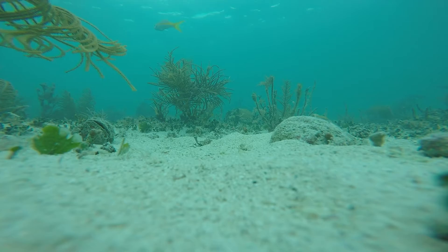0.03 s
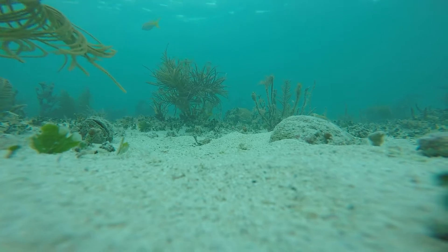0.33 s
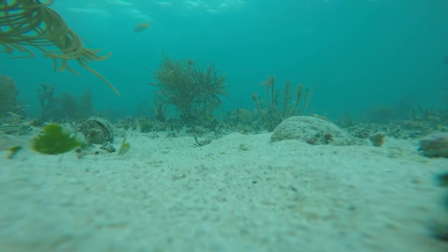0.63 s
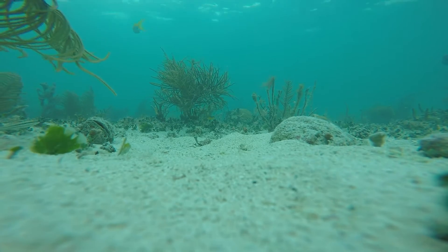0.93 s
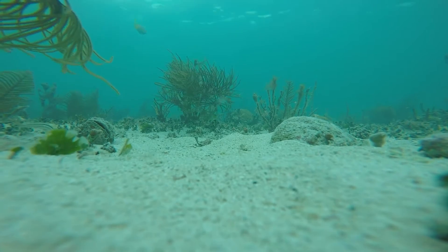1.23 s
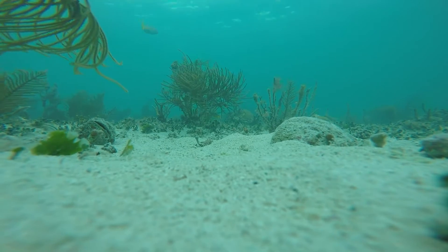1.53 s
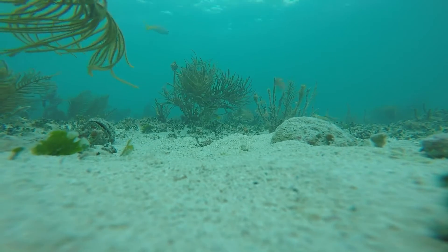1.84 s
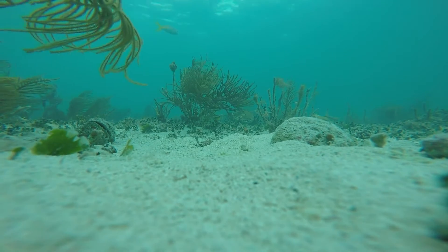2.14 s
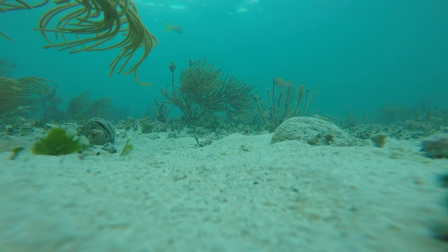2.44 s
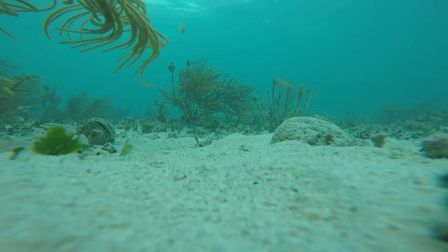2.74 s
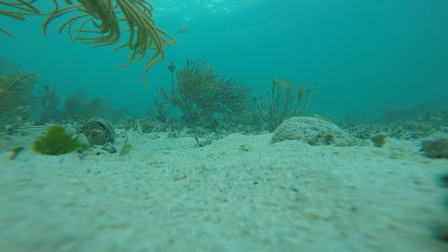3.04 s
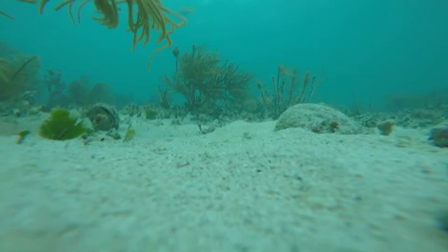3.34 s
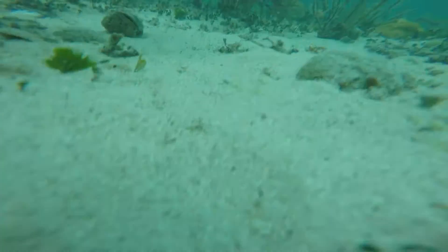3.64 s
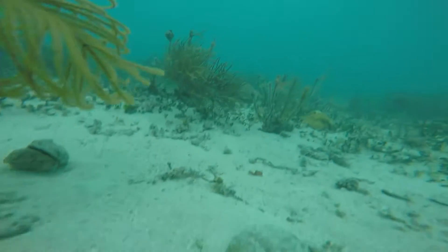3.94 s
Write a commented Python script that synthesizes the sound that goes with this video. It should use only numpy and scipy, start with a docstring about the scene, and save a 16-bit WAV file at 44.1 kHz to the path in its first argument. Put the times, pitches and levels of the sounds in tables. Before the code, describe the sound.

Hollow, grainy scraping comes through the housing of an underwater camera on a reef, amid snapping shrimp and a low hum. After a lull, water and sand rush past, ending in a loud, sharp knock and a brief low throb.

```python
"""A waterproof camera housing scrapes and rocks on a sandy reef, is pulled up with a gritty rush,
takes one hard knock and shudders. Tiny slips and the blow ring the case; moving water buffets it.
Around it shrimp snap, each a dull crack and then a bright one, over water noise, a low hum and
the camera's thin whine. All is heard through the case, in mono; the knock overloads the microphone."""
import sys
import numpy as np
from scipy import signal
from scipy.fft import rfft, irfft
from scipy.io import wavfile
from scipy.ndimage import uniform_filter1d, map_coordinates

SR = 44100
rng = np.random.default_rng(int(sys.argv[2]) if len(sys.argv) > 2 else 0)


def materialize(psi):
    """Save the field psi as 16-bit PCM at rate SR to the path in sys.argv[1].

    A 1-D psi becomes a single channel; in a 2-D psi each row is a channel.
    """
    bounded = np.clip(np.atleast_2d(psi).T, -1, 1)
    quanta = np.round(bounded * 32767).astype(np.int16)
    wavfile.write(sys.argv[1], SR, quanta)


N = 176400


def undb(db):
    """Decibels to gain."""
    return 10 ** (np.asarray(db) / 20)


def unit(x):
    """Scale to an rms of 1."""
    return x / np.sqrt(np.mean(x ** 2))


def clock():
    """Time of each sample in seconds."""
    return np.arange(N) / SR


def curve(rows, column=1):
    """One column of a table, joined by straight lines in time."""
    rows = np.array(rows)
    return np.interp(clock(), rows[:, 0], rows[:, column])


def swell(rows, column=1):
    """Gain envelope from a dB curve, silent outside its span."""
    return undb(curve(rows, column)) * (clock() >= rows[0][0]) * (clock() <= rows[-1][0])


def colour(x, eq):
    """Minimum-phase filter of unit energy, shaped by (freq_hz, gain_db) points."""
    size = 16384
    hz, db = np.array(eq).T
    freqs = np.maximum(np.fft.rfftfreq(size, 1 / SR), 1)
    gain = undb(np.interp(np.log(freqs), np.log(hz), db))
    cepstrum = irfft(np.log(gain))
    cepstrum[1:size // 2] *= 2
    cepstrum[size // 2 + 1:] = 0
    impulse = irfft(np.exp(rfft(cepstrum)))
    return signal.fftconvolve(x, impulse / np.linalg.norm(impulse))[:N]


def butter(order, hz, kind="low"):
    """Butterworth filter sections."""
    return signal.butter(order, hz, kind, fs=SR, output="sos")


def wander(rate_hz):
    """Smooth random drift, rms 1."""
    knots = rng.standard_normal(2048)
    return unit(map_coordinates(knots, [clock() * rate_hz], order=3, mode="mirror"))


def fade(t, t60):
    """Exponential decay that starts at t = 0."""
    return (t >= 0) * np.exp(-np.log(1000) * np.maximum(t, 0) / t60)


def add(track, start_s, sound):
    """Mix a sound into a track in place."""
    i = int(np.clip(start_s * SR, 0, N - 1))
    track[i:i + len(sound)] += sound[:N - i]


def crack(hz, t60, width=.5):
    """A noise burst of unit energy in one broad resonance; width is a share of the pitch."""
    burst = rng.standard_normal(1024) * fade(clock()[:1024], t60)
    rung = signal.lfilter(*signal.iirpeak(min(hz, SR / 4), 1 / width, fs=SR), burst)
    return rung / np.linalg.norm(rung)


def scatter(x, t60):
    """Smear clicks with a decaying cloud of reflections of unit energy."""
    t = clock()[:SR // 4]
    cloud = rng.standard_normal(len(t)) * fade(t, t60)
    return signal.fftconvolve(x, cloud / np.linalg.norm(cloud))[:N]


def friction(eq, slips_per_s, spread_db, hiss_db, spurt_db):
    """Many small slips and a smooth hiss ring the case, in quick spurts under a steady pressure."""
    sizes = undb(spread_db * np.minimum(rng.exponential(size=N), 4))
    slips = unit((rng.random(N) < slips_per_s / SR) * sizes * rng.choice([-1, 1], N))
    hiss = undb(hiss_db) * rng.standard_normal(N)
    spurts = (slips + hiss) * undb(spurt_db * wander(140))
    steady = spurts / np.sqrt(uniform_filter1d(spurts ** 2, size=1800) + 1e-9)
    return unit(colour(steady, eq))


def glide(rows, rough):
    """A wavering tone that follows (time_s, pitch_hz, level_db) points."""
    phase = 2 * np.pi * np.cumsum(curve(rows)) / SR
    tone = (1 + rough * wander(110)) * np.sin(phase) + rough * wander(110) * np.cos(phase)
    return swell(rows, column=2) * tone


# Dark tone of the water bed: freq_hz, gain_db
WATER_EQ = [(10, -29), (25, 1), (55, -5.5), (85, -3), (130, -8.5), (260, -19), (440, -19.5), (600, -11),
            (1100, -31), (1650, -28), (2150, -26.5), (2400, -31.5), (2700, -26.5), (3400, -32),
            (9000, -40.5), (15500, -44.5)]


def water():
    """A steady bed of water noise whose level drifts slightly."""
    return undb(-52 + .6 * wander(5.2)) * colour(rng.standard_normal(N), WATER_EQ)


def hum(pitch_hz=87.5, rise_db_per_s=2.5):
    """A low, wavering underwater hum that slowly grows."""
    t = clock()
    phase = 2 * np.pi * pitch_hz * t + .76 * wander(7.3)
    level_db = -53.5 + rise_db_per_s * (t - t.mean()) + 1.8 * wander(7.92)
    return undb(level_db) * unit(np.sin(phase))


# Partials of the camera's whine: pitch_hz, level_db
WHINE_PARTIALS = [(6309, -78), (12618, -80.5)]


def whine():
    """The camera gives off two faint, steady tones an octave apart."""
    return sum(undb(db) * unit(np.sin(2 * np.pi * hz * clock())) for hz, db in WHINE_PARTIALS)


def far_snaps(per_s=80, centre_hz=2550, octaves=.42, spread_db=2.5):
    """Cues for many weak snaps at random times, each with its own pitch and strength."""
    chance = rng.random(size=(1024, 4))[:int(per_s * N / SR)]
    start_s = chance[:, 0] * N / SR
    pitch_hz = centre_hz * 2 ** (octaves * (2 * chance[:, 1] - 1))
    boost_db = spread_db * np.minimum(-np.log(chance[:, 2:]), 4)
    return list(zip(start_s, pitch_hz, -27 + boost_db[:, 0], -28.5 + boost_db[:, 1]))


# Close shrimp snaps, levels before each layer's trim: start_s, pitch_hz, dull_db, bright_db
NEAR_SNAPS = [(.276, 1480, -9.5, -33), (.344, 1480, -2, -23), (.511, 1990, -3, -8.5),
              (0.651, 2680, 6.5, -9), (.741, 3100, -12.5, -14.5), (.868, 2380, -7.5, -16),
              (.922, 2650, -10, -9), (1.142, 2470, -6, -10), (1.228, 2660, -11.5, -29),
              (1.418, 2900, -12, -12), (1.473, 2700, -7, -12), (1.5074, 2770, 2, -21),
              (1.611, 2000, -17, -11.5), (1.713, 2300, -2.5, -8), (1.751, 2920, -11.5, -18),
              (1.839, 3900, -21, -13), (2.173, 2210, -20, -9), (2.3208, 2400, 8, -0.5),
              (2.454, 2700, -17, -16), (2.5, 3270, -21, -16), (2.621, 3400, -30, -14),
              (2.696, 3000, -8, -10), (2.7236, 2580, -7.5, -20), (2.8357, 2400, 2.5, -6),
              (2.961, 2140, -8.5, -18), (3.3361, 1690, -6, -28), (3.7272, 1980, -9.5, -23),
              (3.806, 2704, -12.5, -25.5)]


def shrimp(dull_trim_db=-10.5, bright_trim_db=-16.5, bright_lag_s=.0031, bright_ratio=4870 / 2550):
    """Each snap is a dull crack and then a bright one, scattered by the seabed; far ones crackle."""
    dull, bright = np.zeros((2, N))
    for start_s, hz, dull_db, bright_db in list(NEAR_SNAPS) + far_snaps():
        add(dull, start_s, undb(dull_db + dull_trim_db) * crack(hz, t60=.02))
        spark = crack(hz * bright_ratio, t60=.007, width=.7)
        add(bright, start_s + bright_lag_s, undb(bright_db + bright_trim_db) * spark)
    snaps = signal.sosfilt(butter(4, 4200), dull) + signal.sosfilt(butter(1, 13600), bright)
    return snaps + undb(-10.5) * scatter(snaps, t60=.087)


# Sand ticks on the lifted case: start_s, level_db
SAND_TICKS = [(3.878, -22), (3.914, -31), (3.933, -32), (3.961, -32), (3.985, -31)]


def grit():
    """Single sand grains strike the case with thin, high ticks."""
    ticks = np.zeros(N)
    for start_s, db in SAND_TICKS:
        add(ticks, start_s, undb(db) * crack(hz=8200, t60=.014))
    return ticks


# Hollow blips, gurgles and thuds against the case: start_s, pitch_hz, level_db, t60_s
BLIP_CUES = [(.168, 804, -35.5, .045), (.191, 553, -28.5, .04), (.198, 2280, -39.5, .048),
             (.26, 1690, -42, .05), (.326, 623, -26, .05), (.328, 350, -30, .04), (.35, 579, -29, 0.066),
             (.38, 202, -28, .09), (.434, 924, -18.5, 0.021), (.452, 530, -27, 0.066),
             (.554, 647, -26, 0.034), (.555, 328, -32, .05), (.709, 36.2, -25.5, .22),
             (1.112, 1400, -42, 0.047), (1.211, 772, -36, .03), (1.368, 618, -26.5, 0.059),
             (2.781, 563, -30, 0.078), (3.961, 758, -37, .07)]


def blips(attack_s=.0033, sag_per_s=1.3, rough=.45):
    """Pockets of water and air ring briefly and unsteadily in the case and sink in pitch."""
    track = np.zeros(N)
    waver = 1 + rough * (wander(110) + 1j * wander(110))
    for start_s, hz, db, t60 in BLIP_CUES:
        t = np.maximum(clock() - start_s, 0)
        phase = 2 * np.pi * np.cumsum(hz * np.exp(-sag_per_s * t) * (t > 0)) / SR
        tone = waver.real * np.sin(phase) + waver.imag * np.cos(phase)
        track += undb(db) * np.minimum(t / attack_s, 1) * fade(t, t60) * tone
    return track


# Surges of water on the case: time_s, level_db
BUFFET_ENVELOPE = [(.3, -56), (.39, -39), (.445, -38), (.48, -57), (.525, -36.5), (.605, -47), (.655, -20),
                   (.70, -35), (.8, -58), (1.05, -66), (1.15, -40.5), (1.21, -56), (1.335, -35),
                   (1.45, -33), (1.54, -54), (1.635, -42.5), (1.75, -52), (2.3, -60), (3.12, -49),
                   (3.33, -44), (3.45, -29), (3.56, -36), (3.85, -43), (4.0, -38)]
# Their sub-heavy tone: freq_hz, gain_db
BUFFET_EQ = [(10, -24), (22, 5.5), (36, 2), (55, -7.5), (80, -1), (115, -15.5), (200, -26.5), (1500, -98)]


def buffeting():
    """Water pushes on the moving case: a low rumble that swells and ebbs."""
    rumble = signal.hilbert(colour(rng.standard_normal(N), BUFFET_EQ))
    strength = np.sqrt(uniform_filter1d(np.abs(rumble) ** 2, size=3000))
    return swell(BUFFET_ENVELOPE) * unit(rumble.real / strength)


# Arc of the squeak: time_s, pitch_hz, level_db
SQUEAK_PATH = [(3.115, 520, -60), (3.14, 558, -46), (3.18, 613, -42), (3.21, 564, -46.5), (3.265, 516, -59)]


def squeak():
    """The case gives a soft, rough squeak that bends up and back down."""
    return glide(SQUEAK_PATH, rough=.65)


# Pulses of the shaking mount: time_s, pitch_hz, level_db
SHUDDER_PATH = [(3.38, 75.9, -61), (3.46, 75.6, -27.5), (3.54, 76.4, -34.5), (3.615, 80.8, -21.5),
                (3.665, 72, -34), (3.71, 69.6, -34), (3.76, 69.2, -59.5)]


def shudder():
    """The mount vibrates with a low, throbbing tone."""
    return glide(SHUDDER_PATH, rough=.12)


# Boxy tone of the scuff: freq_hz, gain_db
SCUFF_EQ = [(50, -8), (135, 7.5), (300, -9.5), (550, -1.5), (1200, -19), (1900, -1.5), (2500, -10.5),
            (3400, -36), (12000, -66)]


def scuff(peak_s=2.217, rise_s=.015, fall_s=.017):
    """The case slips once: a short, bell-shaped swell of friction."""
    t = clock() - peak_s
    envelope = undb(-35.5) * np.exp(-.5 * (t / np.where(t < 0, rise_s, fall_s)) ** 2)
    return envelope * friction(SCUFF_EQ, slips_per_s=540, spread_db=-1.5, hiss_db=-12, spurt_db=1.5)


# Scraping strokes: time_s, level_db
SCRAPE_ENVELOPE = [(.25, -65), (.33, -43), (.35, -36), (.405, -37.5), (.438, -34), (.48, -42),
                   (.515, -36.5), (.545, -43), (.595, -41.5), (.652, -28.5), (.70, -44), (.82, -98),
                   (1.07, -61), (1.15, -47), (1.195, -55)]
# Hollow tone of the scraped case: freq_hz, gain_db
SCRAPE_EQ = [(40, -13), (130, 5.5), (215, 2.5), (340, -8), (560, 2), (740, -0.5), (900, 0.5), (1200, -7.5),
             (1900, 0.5), (2400, -10), (2700, -10), (3600, -17.5), (8000, -35), (15500, -42)]


def scrape():
    """The housing drags in uneven, grainy strokes."""
    texture = friction(SCRAPE_EQ, slips_per_s=1100, spread_db=1.5, hiss_db=-3, spurt_db=1.8)
    return swell(SCRAPE_ENVELOPE) * texture


# Rubbing strokes: time_s, level_db
RUB_ENVELOPE = [(1.2, -58), (1.265, -51), (1.30, -41.5), (1.375, -39.5), (1.43, -44), (1.475, -40),
                (1.55, -56), (1.59, -54), (1.635, -42.5), (1.71, -57)]
# Muffled tone of the rubbed case: freq_hz, gain_db
RUB_EQ = [(40, -8.5), (140, 1.5), (260, -12), (450, -11), (620, 0.5), (950, -12.5), (1400, -21.5),
          (1750, -9.5), (2400, -23.5), (2750, -17.5), (3700, -30), (15500, -59)]


def rub():
    """Sparser slips make a softer, duller rubbing on the case."""
    texture = friction(RUB_EQ, slips_per_s=700, spread_db=2.5, hiss_db=-3, spurt_db=3)
    return swell(RUB_ENVELOPE) * texture


# Build of the rush as the camera is lifted: time_s, level_db
RUSH_ENVELOPE = [(3.12, -66), (3.21, -55), (3.262, -48), (3.30, -58), (3.355, -50), (3.415, -37),
                 (3.462, -29), (3.508, -27.5), (3.535, -39), (3.555, -38.5), (3.595, -68)]
# Its gritty tone: freq_hz, gain_db
RUSH_EQ = [(40, -23.5), (150, 6), (290, -10), (540, -2.5), (1050, -5), (1650, -1), (2350, -7), (2680, 4),
           (3100, -7), (4100, -14), (4700, -12.5), (6800, -24.5), (10000, -26), (15500, -34)]


def lift(crossover_hz=3300, body_lead_s=.014):
    """Water and sand rush over the rising case: the body comes first and the sandy hiss follows."""
    rush = friction(RUSH_EQ, slips_per_s=2500, spread_db=1, hiss_db=-6, spurt_db=1)
    body = signal.sosfiltfilt(butter(2, crossover_hz), rush)
    hiss = rush - body
    early = swell([(time_s - body_lead_s, db) for time_s, db in RUSH_ENVELOPE])
    return early * body + swell(RUSH_ENVELOPE) * hiss


# Modes of the knocked housing, gains relative to the blow: pitch_hz, gain_db, t60_s
HOUSING_MODES = [(552, -21, .07), (586, -26.5, 0.11), (916, -18, 0.04), (1370, -6, 0.016),
                 (1584, 15.5, 0.0059), (1622, -10, 0.035), (1874, -16.5, 0.024), (2180, -5.5, 0.019),
                 (2766, -4, 0.018), (4145, -19.5, 0.011), (4890, -8, 0.011), (8620, -16.5, 0.0066)]


def knock(start_s=3.5567, attack_s=.0016, rebound_lag_s=.0038, hit_db=1.5, rebound_db=-18):
    """A hard blow and its quick rebound ring the case: a short, bright knock with little bass."""
    impact = np.zeros(N)
    for blow_s, blow_db in [(start_s, hit_db), (start_s + rebound_lag_s, rebound_db)]:
        t = clock() - blow_s
        attack = np.clip(t / attack_s, 0, 1)
        for hz, db, t60 in HOUSING_MODES:
            impact += undb(blow_db + db) * attack * fade(t, t60) * np.sin(2 * np.pi * hz * t)
    add(impact, start_s, undb(-6) * crack(hz=5400, t60=.012))
    return signal.sosfilt(butter(2, 427, "high"), impact)


def scene():
    """Everything reaches both channels alike through the housing."""
    case = scuff() + scrape() + rub() + lift() + buffeting() + blips() + squeak() + knock() + shudder()
    mix = case + shrimp() + water() + hum() + whine() + grit()
    return np.tile(mix, (2, 1))


def record(dry):
    """The microphone opens after a moment, flattens the loudest peaks and loses the top."""
    open_s, fade_in_s, top_hz = .072, .0094, 15700
    opened = dry * np.clip((clock() - open_s) / fade_in_s, 0, 1)
    clipped = .97 * opened / (1 + opened ** 6) ** (1 / 6)
    return signal.sosfilt(signal.ellip(8, .2, 80, top_hz, fs=SR, output="sos"), clipped)


dry = scene()
out = record(dry)
materialize(out)
```